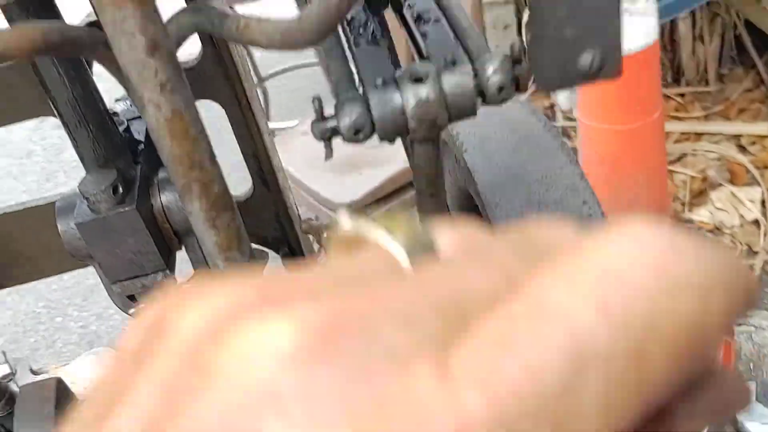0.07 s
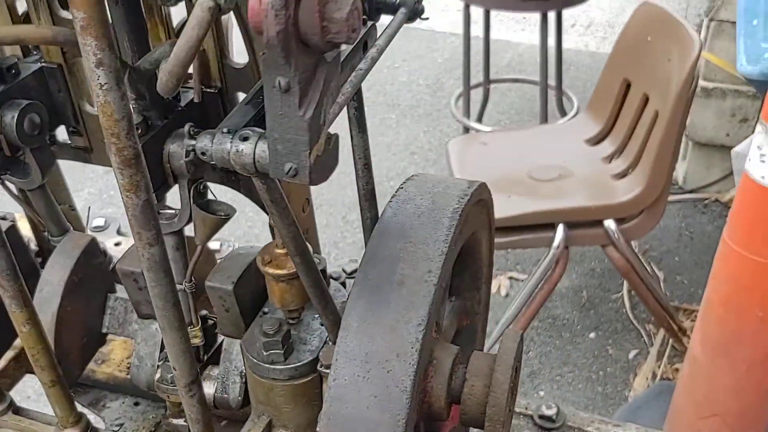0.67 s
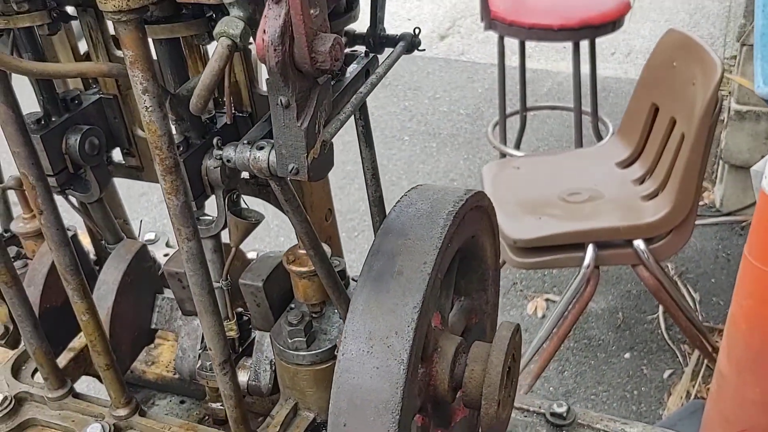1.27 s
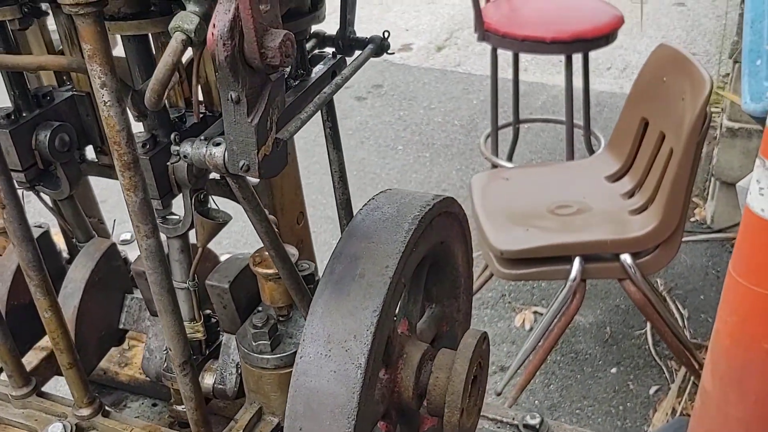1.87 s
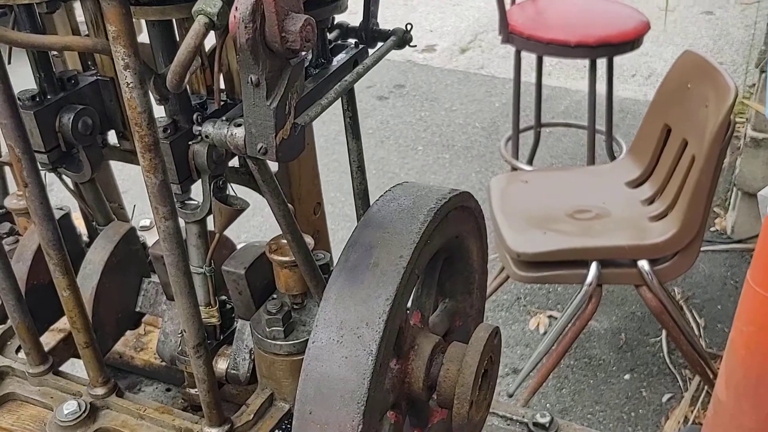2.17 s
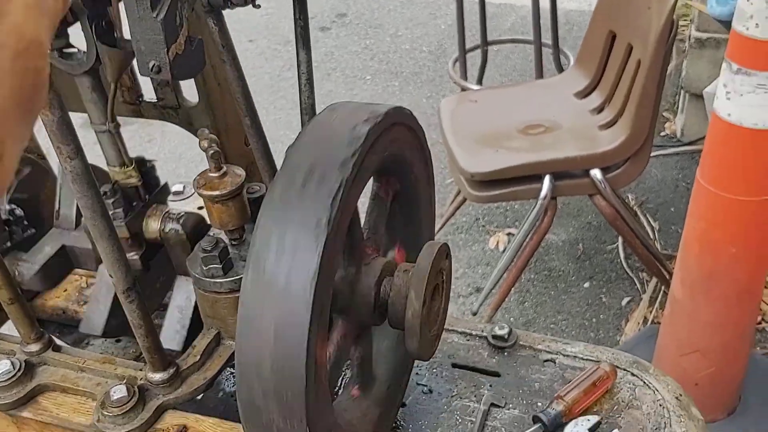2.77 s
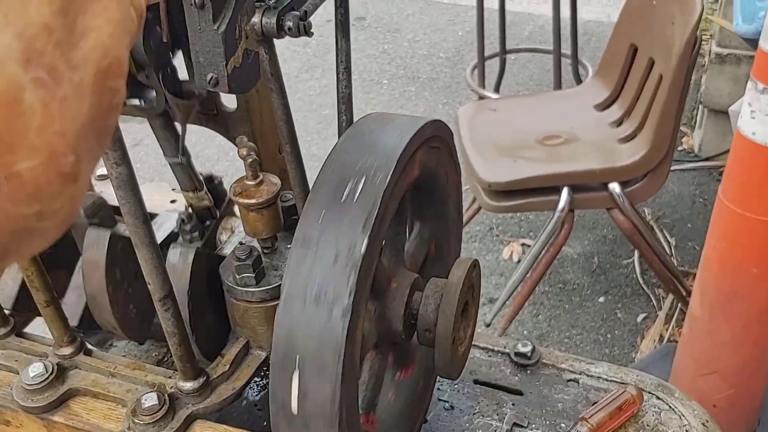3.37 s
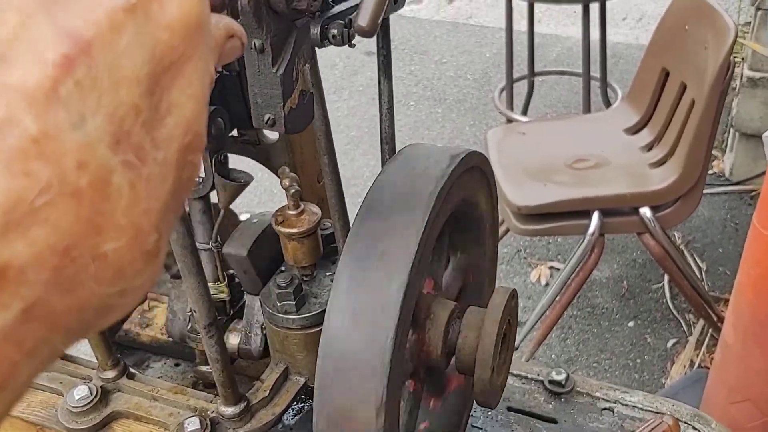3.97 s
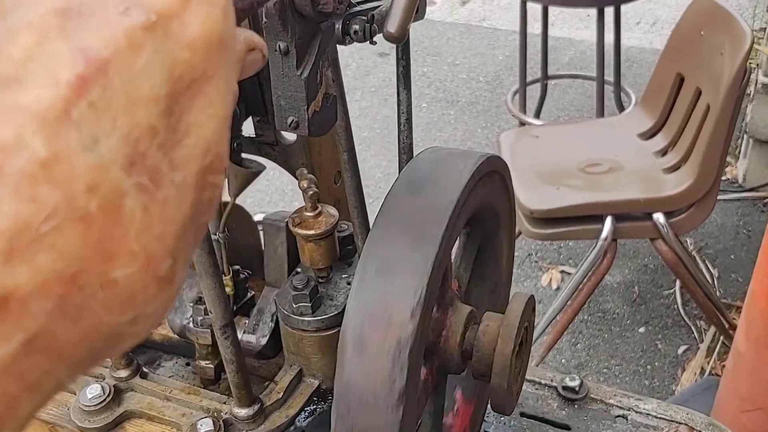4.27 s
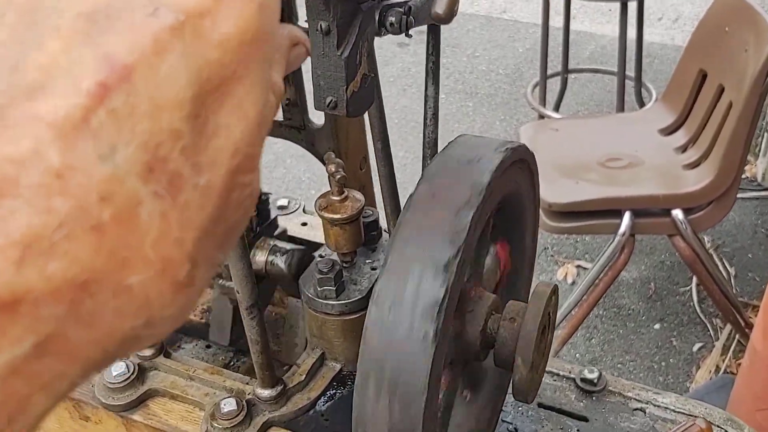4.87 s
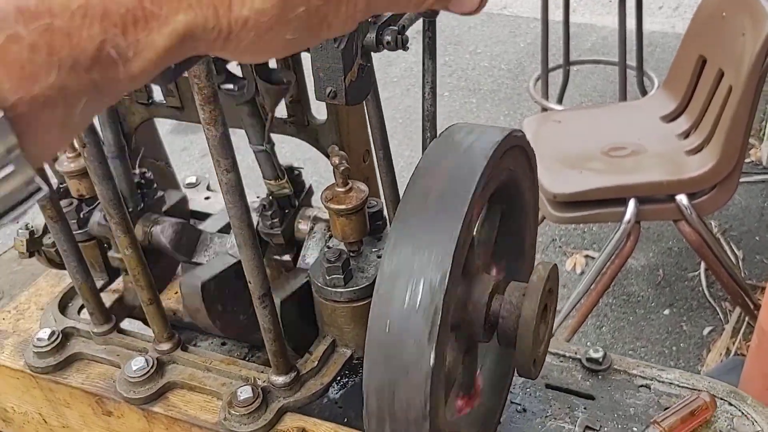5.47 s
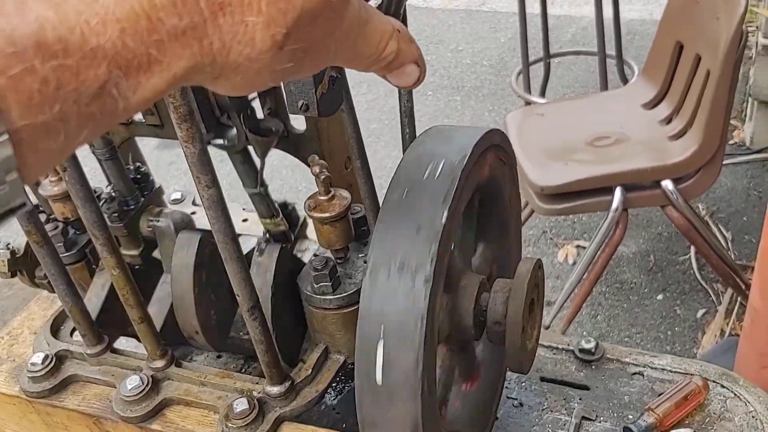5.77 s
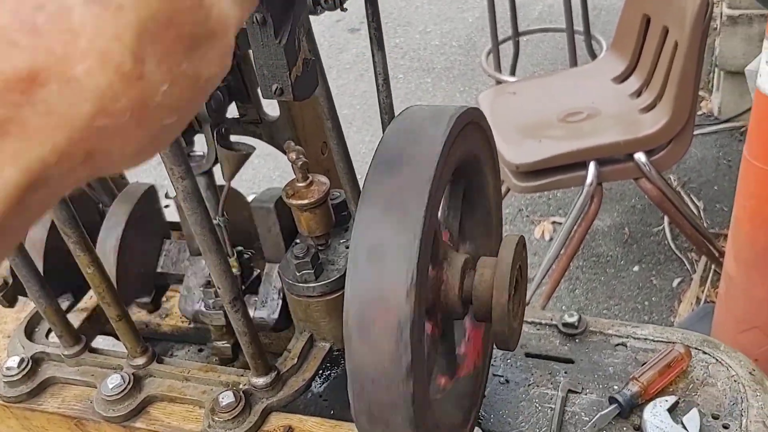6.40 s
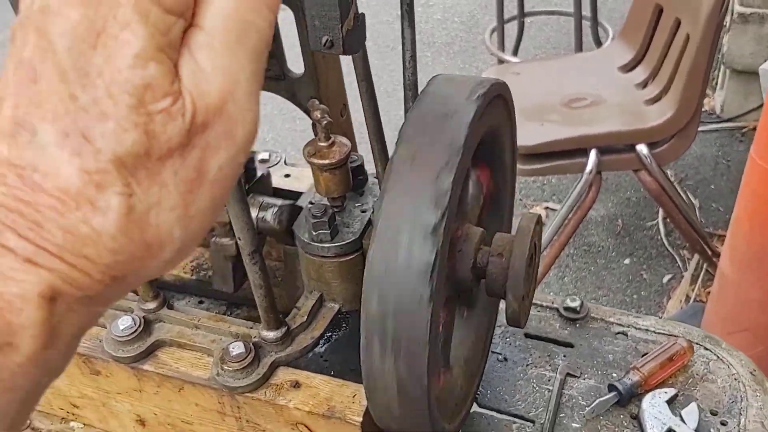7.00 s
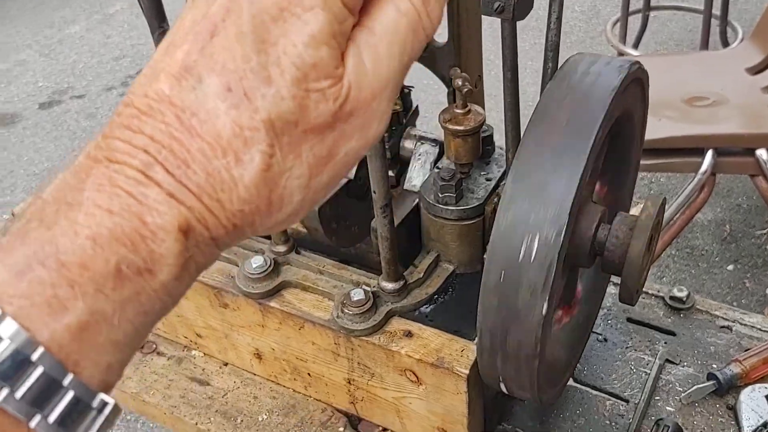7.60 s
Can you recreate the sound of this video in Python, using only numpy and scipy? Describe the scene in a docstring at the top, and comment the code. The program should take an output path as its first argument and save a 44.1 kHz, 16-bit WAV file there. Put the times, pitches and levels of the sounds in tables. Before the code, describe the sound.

A steady steam leak and a brief whistle give way to a small engine racing off and settling into rapid, hissing chugs.

```python
"""A small upright steam engine, outdoors and close by, over a low street hum.
Steam hisses through the standing engine; a valve whistles, spits and chokes the leak. Then the crank
races off with a clatter of rods, sags and settles at under four turns a second. Its angle times the
steam jets, the knocks of slack bearings, the exhaust thumps and the swells of a singing pipe."""
import sys
import numpy as np
from scipy import signal
from scipy.fft import rfft, irfft
from scipy.io import wavfile

SR = 44100
rng = np.random.default_rng(int(sys.argv[2]) if len(sys.argv) > 2 else 0)


def waveform_to_disk(signal):
    """Save audio, clipped to [-1, 1], as 16-bit WAV at the path in sys.argv[1]."""
    frames = np.transpose(np.atleast_2d(signal))
    scaled = np.clip(frames, -1, 1) * 32767
    samples = np.round(scaled).astype(np.int16)
    wavfile.write(sys.argv[1], SR, samples)


N = 336924
TIME, BINS = np.arange(N) / SR, np.fft.rfftfreq(N, 1 / SR)
START_S = 2.797  # the crank breaks loose
# the crank races, sags and settles: time_s, turns_per_s
CRANK_SPEED = [(3.057, 5.208), (3.167, 5.849), (3.552, 4.091), (3.965, 3.522), (4.495, 3.748)]


def amp(db):
    """Decibels to gain."""
    return 10 ** (np.asarray(db) / 20)


def unit(x):
    """Scales to rms 1."""
    return x / np.sqrt(np.mean(x ** 2) + 1e-20)


def curves(rows):
    """Turns breakpoints into one automation curve per column after the time."""
    s, *columns = np.transpose(rows)
    return [np.interp(TIME, s, column) for column in columns]


def ramp(start_s, length_s):
    """A linear fade from 0 to 1."""
    return np.clip((TIME - start_s) / length_s, 0, 1)


def across(points):
    """Draws a curve through breakpoints on the log-frequency axis."""
    hz, value = np.transpose(points)
    return np.interp(np.log(BINS + 1), np.log(hz + 1), value)


def band(hz, octaves, at=BINS):
    """A bell on the log-frequency axis."""
    return np.exp(-.5 * (np.log2((at + 1) / hz) / octaves) ** 2)


def resonance(hz, width_hz):
    """Gain of a resonant peak with steep skirts."""
    return 1 / (1 + ((BINS - hz) / width_hz) ** 2)


def pan(left_db):
    """Stereo gains: positive leans left, negative right."""
    gains = amp(np.array([left_db, -left_db]).reshape(2, -1) / 2)
    return gains / np.sqrt(np.mean(gains ** 2, 0))


def filtered(x, gain):
    """EQ with one gain per bin."""
    return irfft(rfft(x) * gain, N)


def add(mix, start_s, sound):
    """Drops a sound into the mix."""
    part = mix[..., round(start_s * SR):][..., :sound.shape[-1]]
    part += sound[..., :part.shape[-1]]


def wander(rate_hz):
    """Smooth random modulation, rms 1."""
    return unit(filtered(rng.standard_normal(N), np.exp(-(BINS / rate_hz) ** 2)))


def noise(gain):
    """Turbulence of a given spectrum, centred in the bass and wide in the treble."""
    # likeness of the two ears: frequency_hz, coherence
    likeness = [(60, 0.99), (150, 0.95), (300, 1), (650, 0.67), (1400, 0.15), (3000, 0.26), (7000, 0),
                (16000, 0.037)]
    same = np.clip(across(likeness), -1, 1)
    phases = np.exp(2j * np.pi * rng.random((2, len(BINS))))
    left, other = phases * rng.rayleigh(1, (2, len(BINS)))
    right = same * left + np.sqrt(1 - same ** 2) * other
    return unit(irfft(np.array([left, right]) * gain, N))


def peaked_noise(peaks):
    """Noise in a set of narrow peaks, each at its own level."""
    power = sum((amp(db) * resonance(hz, width)) ** 2 / width for hz, width, db in peaks)
    level = np.sqrt(sum(amp(db) ** 2 for _, _, db in peaks))
    return level * noise(np.sqrt(power))


def patchy(x, depth_db, width_hz, lasts_s):
    """A jet's colour keeps shifting: narrow patches of its spectrum swell and fade."""
    hz, s, spectrum = signal.stft(x, SR, nperseg=1024)
    along_hz, along_s = np.fft.fftfreq(len(hz), hz[1])[:, None], np.fft.fftfreq(len(s), s[1])
    smooth = np.exp(-(2 * along_hz * width_hz) ** 2 - (2 * along_s * lasts_s) ** 2)
    speckle = np.fft.fft2(rng.standard_normal(spectrum.shape[1:]))
    patches = unit(np.fft.ifft2(speckle * smooth).real)
    return signal.istft(spectrum * amp(depth_db * patches), SR, nperseg=1024)[1][:, :N]


def standing_steam(split_hz=7000, drone_hold_s=0.38, drone_fall_db_per_s=12.5, choke_db=-11):
    """Steam blows through the still cylinders until the valve chokes it and the crank turns."""
    # the leak above and below the split: time_s, hiss_db, rush_db
    leak_levels = [(0.0, -22.5, -22), (0.63, -20, -21.5), (0.98, -19.5, -21), (1.73, -20.5, -22.5),
                   (2.14, -18.5, -20), (2.31, -20.5, -20), (2.43, -21.5, -18.5), (2.64, -21.5, -25)]
    # tone of the leak: frequency_hz, level_db
    leak_colour = [(530, -66), (900, -43), (1090, -18.5), (1280, -14.5), (1530, -17), (1920, -24.5),
                   (2730, -6), (3000, -12.5), (3470, -7), (5610, -0.5), (7230, -4.5), (9090, -3),
                   (10800, -6.5), (15100, -5.5), (16000, -12)]
    # stereo lean of the leak: frequency_hz, left_db
    leak_pan = [(60, 0.5), (92, 2.0), (140, 3.0), (210, 22), (330, 8), (500, 4.0), (770, 13), (1170, -0.5),
                (1790, -6), (2740, 2), (4190, 4.5), (6410, 4), (9810, -11), (15000, -4)]
    # resonances of the steam passages: pitch_hz, width_hz, level_db
    passages = [(1095, 62, -47), (1291, 21, -44), (1512, 25, -45), (2304, 220, -41), (5900, 200, -34),
                (8500, 190, -39), (9300, 250, -39.5), (15800, 260, -31)]
    hiss_db, rush_db = curves(leak_levels)
    colour = amp(across(leak_colour))
    highs = 1 / (1 + (split_hz / (BINS + 1)) ** 8)
    steam = amp(hiss_db + 2.5) * noise(colour * highs)
    steam += amp(rush_db + 1.5 + 0.8 * wander(4.7)) * noise(colour * (1 - highs))
    steam += peaked_noise(passages) * amp(0.23 * (hiss_db - hiss_db[SR]))  # gently follows the hiss
    steam = patchy(steam, depth_db=1.0, width_hz=160, lasts_s=0.21)
    # a hollow drone holds, then sinks as the cylinders fill
    drone_db = np.maximum(-37.5 - drone_fall_db_per_s * np.maximum(TIME - drone_hold_s, 0), -49)
    steam += amp(drone_db) * noise(resonance(514, 37) + 0.26 * resonance(417, 47))
    steam *= amp(0.5 * wander(40) + choke_db * ramp(start_s=2.7, length_s=0.065))
    steam *= 1 - ramp(START_S, 0.044)
    return filtered(steam, pan(across(leak_pan)))


def edge_tone(hz, width_hz):
    """A narrow band of turbulence riding a gliding pitch."""
    carrier = np.exp(2j * np.pi * np.cumsum(hz) / SR)
    spread = np.exp(-(np.fft.fftfreq(len(hz), 1 / SR) / width_hz) ** 2)
    white = rng.standard_normal((2, N, 2))[:, :len(hz)] @ [1, 1j]
    common, right_only = (carrier * np.fft.ifft(spread * np.fft.fft(white))).real
    return unit(np.array([common, common + right_only]))


def edge_tones():
    """The leak catches on sharp edges: each tone swells and fades in one arch."""
    # breathy glides: start_s, length_s, first_hz, last_hz, width_hz, level_db, left_db
    glides = [(0, .55, 12100, 13700, 1200, -22.5, 2), (.08, .38, 4090, 3990, 720, -20, 9),
              (0.477, .45, 9150, 9080, 260, -26.5, -20), (0.799, .6, 8560, 8480, 260, -31, -20),
              (1.502, .6, 9350, 9450, 220, -34, -20), (2.03, .3, 8800, 8780, 260, -45, -20)]
    out = np.zeros((2, N))
    for start_s, length_s, first_hz, last_hz, width_hz, db, left_db in glides:
        progress = np.linspace(0, 1, round(length_s * SR))
        tone = edge_tone(first_hz + (last_hz - first_hz) * progress, width_hz)
        add(out, start_s, amp(db) * np.sin(np.pi * progress) * tone * pan(left_db))
    return out


def street(level_db=-46):
    """A steady bed of low street hum."""
    # tone of the hum: frequency_hz, level_db
    hum_colour = [(15, -64), (25, -52), (70, -10.5), (145, -6), (167, -3.5), (319, -12), (507, -7.5),
                  (734, -14.5), (1000, -14), (1300, -37), (2200, -120)]
    return amp(level_db) * noise(amp(across(hum_colour)))


def valve_whistle(level_db=-20.5, rise_s=0.021, fade_s=0.052, waver_hz=45, breath_db=-6):
    """Steam whistles unsteadily at the valve's narrowing port."""
    # the whistle's bends: time_s, pitch_hz
    bends = [(2.39, 3344), (2.462, 3294), (2.482, 3081), (2.602, 3466), (2.67, 3272)]
    envelope = ramp(bends[0][0], rise_s) * (1 - ramp(bends[-1][0] - fade_s, fade_s))
    hz = curves(bends)[0] + waver_hz * wander(250)
    tone = unit(np.sin(2 * np.pi * np.cumsum(hz) / SR) * amp(wander(90)))
    breath = amp(breath_db) * edge_tone(hz, width_hz=410)
    return amp(level_db) * envelope * (tone + breath) * pan(left_db=9)


def puff(u):
    """Envelope of a port that opens near u = -1 and shuts a little more gently near 1."""
    return 1 / (1 + (u * u) ** 2 * (1 + u * u * (1 + (u < 0))))


def spurts():
    """Steam spits as the valve moves and the crank starts, and twice more near the end."""
    # single spits: peak_s, half_length_s, level_db, centre_hz, spread_octaves
    spits = [(2.414, 0.012, -30.5, 520, 1.1), (2.435, 0.049, -22, 5000, 1), (2.665, 0.017, -30.5, 600, 1.8),
             (2.694, 0.019, -18, 1280, 0.068), (2.689, 0.026, -21, 2910, 0.14),
             (2.691, 0.03, -18.5, 3600, 0.78), (2.731, 0.0056, -15.5, 3820, 1.2),
             (2.778, 0.17, -29, 1015, 1.46), (2.836, 0.043, -19, 5200, 1.3), (2.964, 0.007, -22, 4040, 1.3),
             (3.017, 0.017, -18.5, 4600, 0.94), (3.149, .026, -19, 8000, 1.4), (7.33, .018, -21, 13500, .1),
             (7.597, .018, -18, 13700, .1)]
    return sum(amp(db) * puff((TIME - peak_s) / half_s) * noise(band(hz, octaves))
               for peak_s, half_s, db, hz, octaves in spits)


def crank_angle(dead_centre_s=5.6167):
    """Turns of the crank, counted from one pass through dead centre."""
    turns = np.cumsum(curves(CRANK_SPEED)[0]) / SR
    return turns - np.interp(dead_centre_s, TIME, turns)


def passes(crank, angle):
    """The times at which the running crank passes an angle."""
    times = TIME[1:][np.diff(np.floor(crank - angle)) > 0]
    return times[times > START_S]


def running_steam(crank, age_s, seep_db=-26, drift_db_per_s=-0.54):
    """Steam seeps all the time, and wet jets blow at fixed crank angles."""
    # tone of the seepage: frequency_hz, level_db
    seep_colour = [(1060, -32), (1800, -10), (2120, 7), (2410, -6), (2620, -19), (2920, 1), (4140, -2),
                   (6070, 12), (6900, -5), (8360, 3.5), (9000, 8.5), (11000, 2), (12400, 5.5), (15100, 5.5),
                   (16000, 10)]
    # jets in every turn: angle_turns, half_length_turns, level_db, centre_hz, spread_octaves, left_db
    jets = [(.22, 0.012, -26.5, 5300, 0.2, -7), (.25, 0.085, -32.5, 2250, 0.69, -5),
            (0.388, 0.061, -16, 11200, 1.03, -2.5), (0.404, 0.063, -22, 5070, 0.27, 6),
            (0.495, 0.066, -20, 6230, 1.08, -1), (0.492, 0.074, -25, 1730, 0.76, 2.5),
            (.713, 0.0082, -15, 11000, 0.77, 2), (.742, .011, -19.5, 5800, 0.85, 0.5),
            (0.813, 0.0025, -22, 3920, 0.24, -1), (0.984, 0.05, -24, 5400, 1.5, -1)]
    # narrow treble peaks in the running hiss: centre_hz, width_hz, level_db
    hiss_peaks = [(5000, 120, -51), (6330, 180, -46), (7540, 320, -39), (8420, 96, -38), (9600, 250, -43.5),
                  (10960, 240, -36.5), (13500, 230, -52)]
    # steam fed to the engine: time_s, gain_db
    feed = [(2.8, 3.5), (3.0, 1.1), (5.7, 1), (7.25, 0), (7.64, -4)]
    steam = amp(seep_db) * noise(amp(across(seep_colour)))
    for angle, half_turns, db, hz, octaves, left_db in jets:
        offset = (crank - angle + .5) % 1 - .5
        steam += amp(db) * puff(offset / half_turns) * noise(band(hz, octaves)) * pan(left_db)
    steam = steam * amp(wander(68)) + peaked_noise(hiss_peaks)
    return steam * amp(curves(feed)[0]) * pan(-0.6 + drift_db_per_s * age_s)  # drifts to the right


def singing_pipe(crank, level_db=-33.5, stroke_db=2, turn_db=1.6, loudest_turns=0.27):
    """Passing steam makes a pipe sing, swelling on four piston strokes a turn, most on one of them."""
    # resonances of the pipe: pitch_hz, width_hz, level_db
    pipe_modes = [(371, 100, -4), (1305, 29, 0.5), (2091, 33, -10.5), (2928, 18, -9.5)]
    song = 0
    for hz, width_hz, db in pipe_modes:
        tone = signal.hilbert(noise(resonance(hz, width_hz)))
        song += amp(db) * unit(tone.real / (abs(tone) + 0.14) ** 0.068)  # saturates slightly
    phase = 2 * np.pi * (crank - loudest_turns)
    return amp(level_db + stroke_db * np.cos(4 * phase) + turn_db * np.cos(phase)) * song


def rumble(speed, level_db=-28.5, lumpy_db=2.5):
    """Sliding parts give a lumpy rumble that grows with speed."""
    # tone of the sliding parts: frequency_hz, level_db
    slide_colour = [(30, -59), (70, -15), (120, -5), (220, -3), (300, -0.5), (410, -3.5), (560, -6.5),
                    (700, -9), (850, -15.5), (1020, -4.5), (1550, -18), (2150, -9), (2600, -15.5),
                    (4000, -17.5)]
    return amp(level_db + lumpy_db * wander(25)) * speed ** 1.86 * noise(amp(across(slide_colour)))


def bedplate_boom(age_s, level_db=-36, calms_s=1.8):
    """The bedplate booms after the start and calms down."""
    return amp(level_db) * np.exp(-(age_s / calms_s) ** 2) * noise(resonance(hz=174, width_hz=38))


def ring(modes, alternate):
    """The ring-out of struck modes; alternate flips the polarity of every other one."""
    t = TIME[:SR // 8]
    return sum((-1) ** (k * alternate) * amp(db - 60 * t / t60_s) * np.sin(2 * np.pi * hz * t)
               for k, (hz, db, t60_s) in enumerate(modes))


def strike(blows, chatter_s, hz, octaves, chatter, size=4096):
    """Blows (start_s, level_db) on one spot of the frame: a click and a short chatter set it ringing."""
    # modes of the iron frame: pitch_hz, level_db, t60_s
    frame_modes = [(307, -2.5, 0.039), (383, -3.5, 0.063), (464, -2, 0.022), (635, -3.5, 0.031),
                   (787, -0.5, 0.017), (854, -2.5, 0.043), (1280, 0.5, 0.015), (1542, 1, 0.025),
                   (1760, 1.5, 0.011), (2014, -9, 0.033), (2240, -4.5, 0.016), (2880, -11.5, 0.04),
                   (3850, -12.5, 0.012)]
    body = rfft(ring(frame_modes, alternate=True), size) * band(hz, octaves, np.fft.rfftfreq(size, 1 / SR))
    shared_grit = rng.standard_normal(size)  # makes the blows partly alike
    fade = np.minimum(np.linspace(2, 0, size), 1)
    out = np.zeros((2, N))
    for start_s, db in blows:
        grit = shared_grit + rng.standard_normal(size) + rng.standard_normal((2, size))
        force = chatter * grit * np.exp(-TIME[:size] / chatter_s)
        force[:, 0] += 1  # the click
        clank = unit(irfft(rfft(force) * body) * fade)
        add(out, start_s, amp(db) * clank * np.sqrt(.006 * SR / size))  # energy of 6 ms at that level
    return out


def rod_clatter():
    """The loose rods clank as the crank takes off."""
    # the loudest clanks: start_s, level_db
    clanks = [(2.812, -18.5), (2.884, -27), (2.900, -17), (2.956, -19), (2.975, -14), (2.990, -20),
              (3.060, -15), (3.132, -16.5)]
    return strike(clanks, chatter_s=0.0072, hz=814, octaves=2.1, chatter=0.081)


def bearing_knocks(crank, vary_db=0.75):
    """Each bearing takes up its slack with a knock once a turn."""
    # knocks in every turn: angle_turns, level_db, chatter_s, centre_hz, spread_octaves
    bearings = [(0.214, -29.5, 0.004, 890, 0.6), (0.404, -27, 0.0032, 333, 0.69),
                (.503, -21.5, 0.00069, 734, 0.63), (.524, -22, 0.009, 730, 0.73),
                (0.714, -28, 0.0035, 710, 0.72), (0.736, -20, 0.0066, 720, 0.83),
                (.742, -21, 0.0067, 1630, .45), (.812, -24.5, 0.0042, 1290, 1.3),
                (.838, -19.5, 0.007, 800, 1.9), (.972, -33, 0.0014, 700, 0.66)]
    out = np.zeros((2, N))
    for angle, db, chatter_s, hz, octaves in bearings:
        blows = [(s, db + vary_db * rng.normal()) for s in passes(crank, angle)]
        out += strike(blows, chatter_s, hz, octaves, chatter=0.083)
    return out


def rod_rattle(count=260, level_db=-37.5, racing_db=15.5, settles_s=0.68, vary_db=3):
    """The rods rattle lightly at random, harder during the opening race."""
    age_s = rng.uniform(0, N / SR - START_S, count)
    db = level_db + racing_db * np.exp(-(age_s / settles_s) ** 2) + vary_db * rng.standard_normal(count)
    return strike(zip(START_S + age_s, db), chatter_s=0.0018, hz=1300, octaves=4.3, chatter=0.088)


def exhaust(crank, speed, age_s, vary_db=1.0, ease_db_per_s=0.8):
    """Each release of steam thumps the exhaust pipe: harder at speed, softer as the engine runs in."""
    # releases in every turn: angle_turns, level_db
    strokes = [(0.343, -30), (0.402, -27), (.48, -20.5), (.988, -19)]
    # modes of the exhaust pipe: pitch_hz, level_db, t60_s
    exhaust_modes = [(116, -6, 0.094), (167, 0, 0.04), (300, 2, 0.021)]
    out, thump = np.zeros(N), -ring(exhaust_modes, alternate=False)
    for angle, db in strokes:
        for s in passes(crank, angle):
            add(out, s, thump * amp(db + vary_db * rng.normal()))
    low_cut = signal.butter(3, 80, "high", fs=SR, output="sos")  # the open end radiates no deep bass
    filled = ramp(start_s=2.93, length_s=0.23)  # the beat builds once the cylinders have filled
    return signal.sosfilt(low_cut, out) * filled * speed ** 1.23 * amp(1.7 - ease_db_per_s * age_s)


def running_engine(load_db=2.16, slack_db=-7, load_takes_s=0.38):
    """All the moving parts on one crank; boom, knocks, rattle and thumps firm up under load."""
    # stereo lean of the running engine: frequency_hz, left_db
    engine_pan = [(60, 2), (92, 0.5), (140, 7.5), (210, -5), (330, 2.5), (500, 3), (770, -2.5), (1170, -5),
                  (1790, -7.5), (2740, 4), (4190, 2.5), (6410, 3), (9810, -10.5), (15000, -5)]
    crank, age_s = crank_angle(), np.maximum(TIME - START_S, 0)
    speed = curves(CRANK_SPEED)[0] / CRANK_SPEED[-1][1]  # 1 once settled
    load = amp(load_db + slack_db * np.exp(-age_s / load_takes_s))
    parts = running_steam(crank, age_s) + singing_pipe(crank) + rumble(speed) + rod_clatter()
    parts += load * (bedplate_boom(age_s) + bearing_knocks(crank) + rod_rattle())
    parts += load * exhaust(crank, speed, age_s)
    gate = np.interp(TIME, [START_S - .015, START_S + .035, TIME[-300], TIME[-1]], [0, 1, 1, 0])
    return filtered(parts * gate, pan(across(engine_pan)))


def nearby_metal(x, count=8, wet=.55, first_s=.00097, reach_s=.005, sway_s=.00005):
    """Rods, wheel and bedplate throw back short echoes whose swaying delays ripple the treble."""
    bright, out = filtered(x, BINS / (BINS + 1500)), x.copy()
    sways = wander(1.0), wander(0.77)
    for side in range(2):
        for distance, lean, polarity in rng.random((count, 3)):
            sway = np.cos(2 * np.pi * lean) * sways[0] + np.sin(2 * np.pi * lean) * sways[1]
            delay_s = first_s + reach_s * distance + sway_s * sway
            echo = np.interp(TIME - delay_s, TIME, bright[side], left=0)
            out[side] += np.sign(polarity - .5) * wet / np.sqrt(count) * echo
    return out


def scene():
    """The engine among its own echoes, over the hum of the street."""
    engine = standing_steam() + edge_tones() + valve_whistle() + spurts() + running_engine()
    return nearby_metal(engine) + street()


def record(dry, top_hz=15900):
    """Master EQ: a narrow dip in the presence range and a steep high cut."""
    coloured = filtered(dry, 1 - 0.68 * resonance(hz=2654, width_hz=83))
    high_cut = signal.firwin(511, top_hz, window=("kaiser", 9), fs=SR)
    return signal.oaconvolve(coloured, high_cut[None], "same")


dry = scene()
out = record(dry)
waveform_to_disk(out)
```